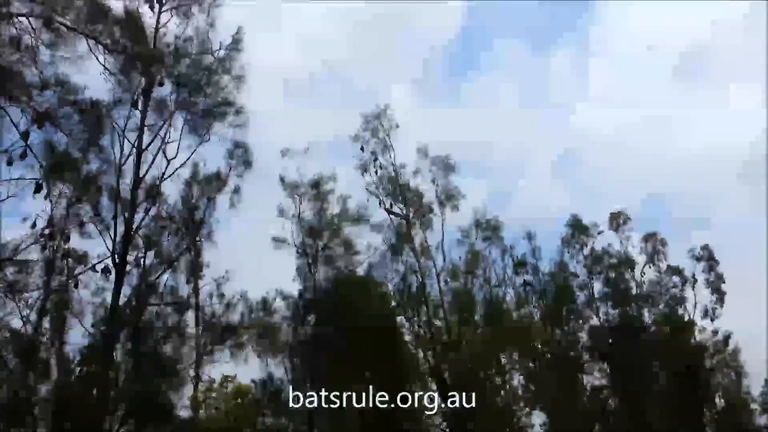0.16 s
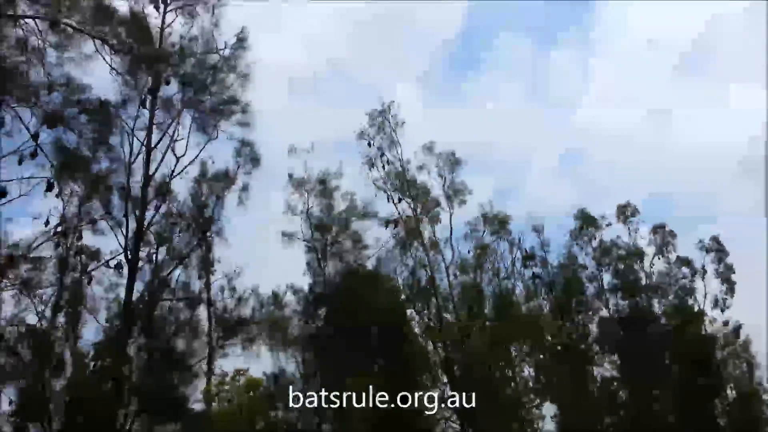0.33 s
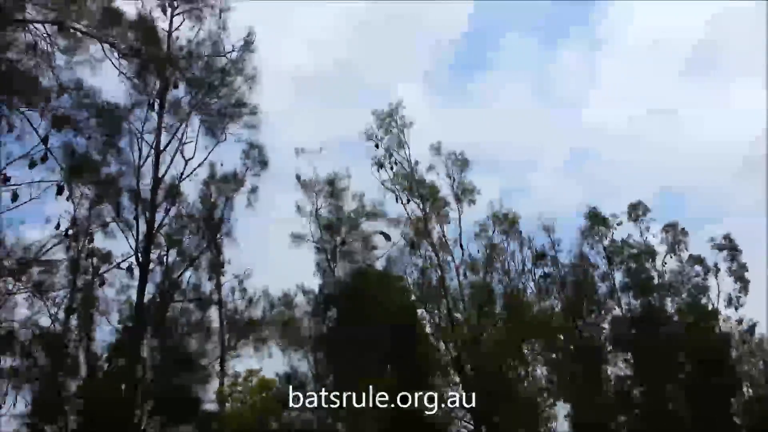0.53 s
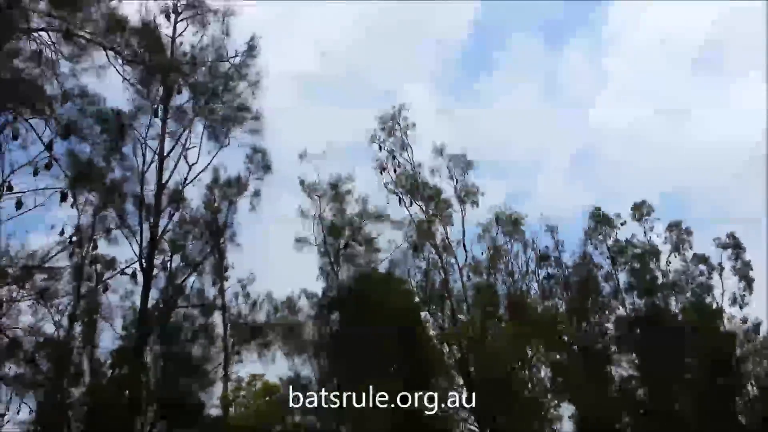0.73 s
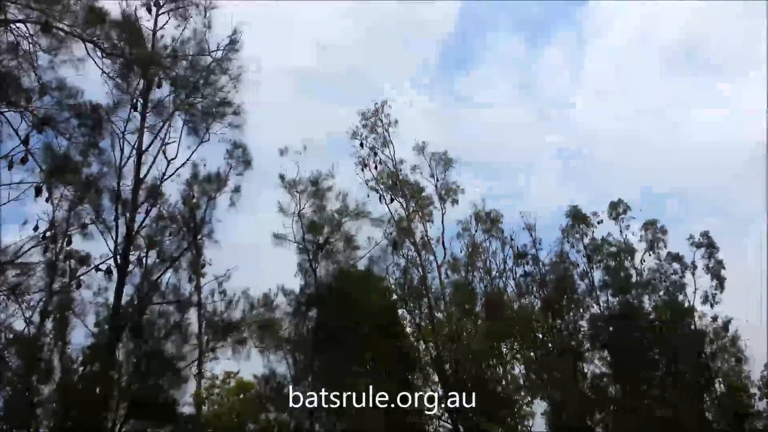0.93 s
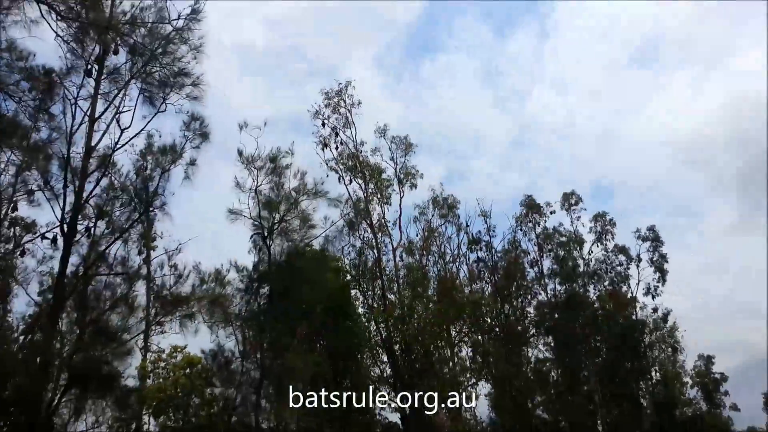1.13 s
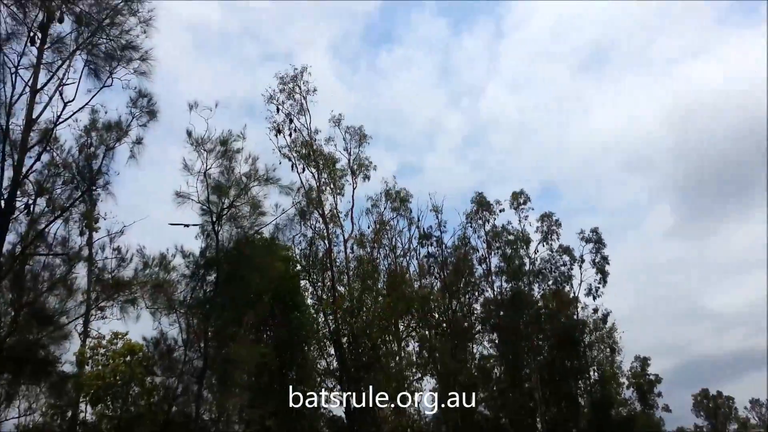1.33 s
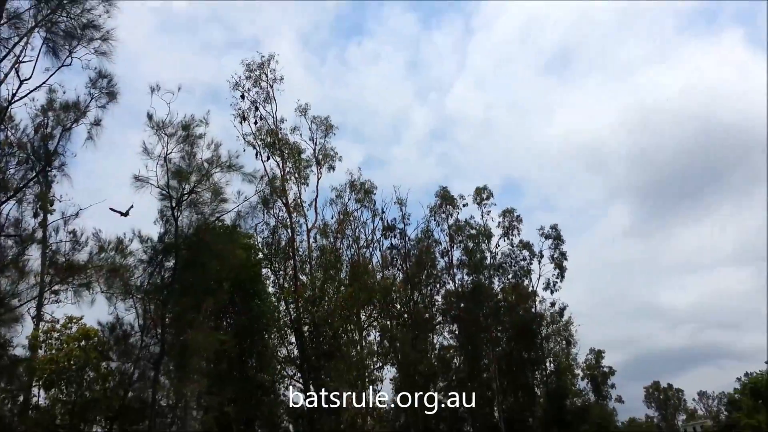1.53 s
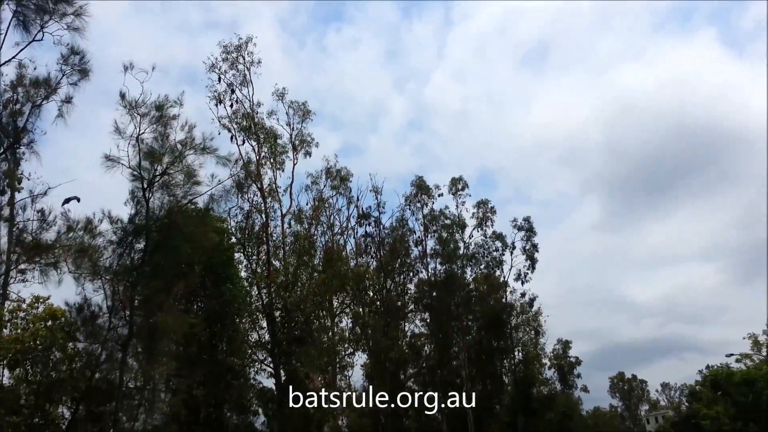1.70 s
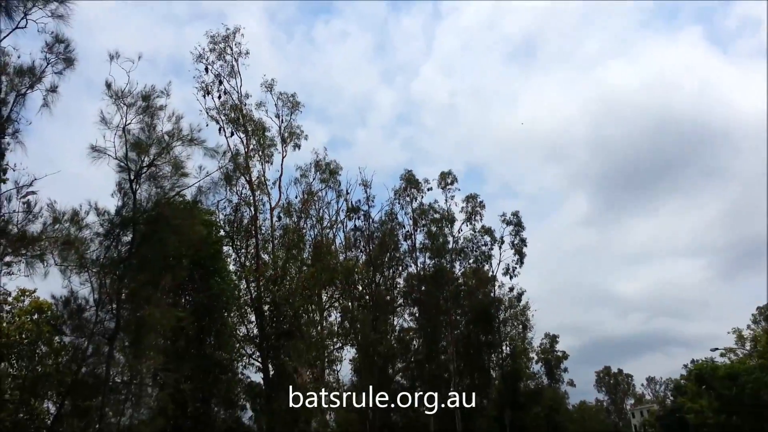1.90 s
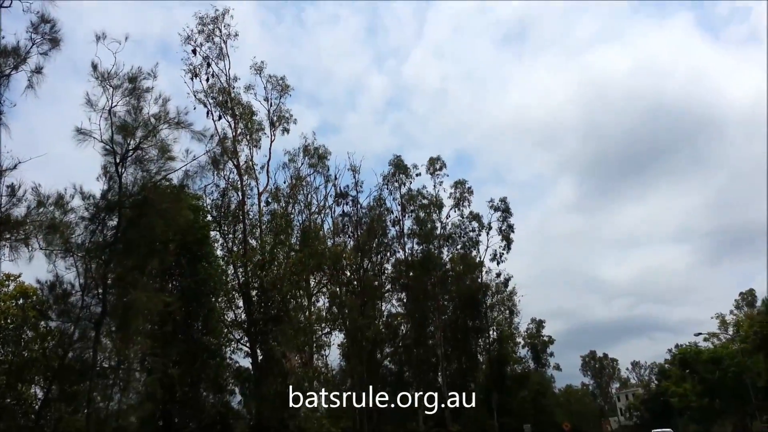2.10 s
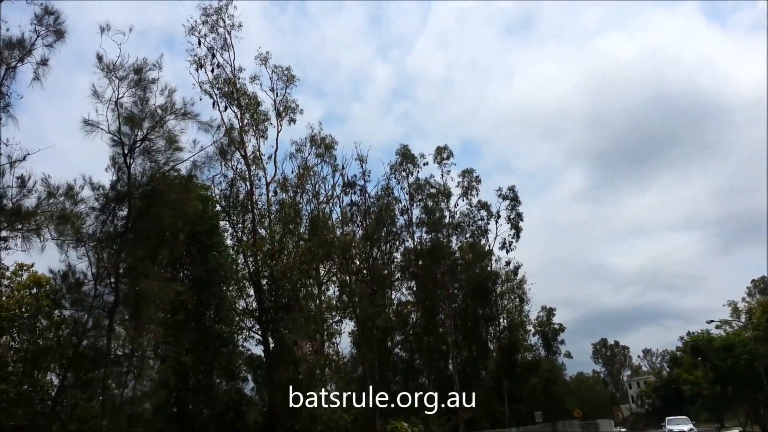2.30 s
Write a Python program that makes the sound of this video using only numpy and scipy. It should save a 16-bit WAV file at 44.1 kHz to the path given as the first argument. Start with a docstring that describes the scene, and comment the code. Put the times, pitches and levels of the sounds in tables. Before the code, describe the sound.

Bats squabble in trees outdoors. One close to the microphone gives a harsh, rattling screech, then a shorter one, while others squeal and rasp around it. The calls thin out over faint insects and a low distant wash.

```python
"""Flying foxes squabble in a stand of trees, over a far colony, insects and a low distant wash.
Neighbours start to squeal. At 0.3 s a near bat screeches: a whistle slides up, breaks into a harsh
rattle and sinks again. A shorter screech follows at 0.95 s, amid squeals and rasps; the trunks
scatter the calls. Then the squeals thin out, the colony fades and the wash slowly grows."""
import sys
import numpy as np
from scipy import signal
from scipy.fft import rfft, irfft, next_fast_len
from scipy.io import wavfile
from scipy.ndimage import uniform_filter1d

SR = 44100
rng = np.random.default_rng(int(sys.argv[2]) if len(sys.argv) > 2 else 0)


def to_wav(sig):
    """Store sig (one row per channel, or 1-D mono) as 16-bit WAV at the path in sys.argv[1].

    Samples outside -1..1 are clipped; the rate is SR.
    """
    pcm = np.clip(np.atleast_2d(sig), -1, 1) * 32767
    pcm = np.round(pcm).astype(np.int16)
    wavfile.write(sys.argv[1], SR, pcm.T)  # frames by channels


N = 103635
T = np.arange(N) / SR
BINS_HZ = np.fft.rfftfreq(2 * N, 1 / SR)


def amp(db):
    """dB to gain."""
    return 10 ** (np.asarray(db) / 20)


def unit_rms(x):
    """Scale to rms 1."""
    return x / np.sqrt(np.mean(abs(x) ** 2) + 1e-20)


def at_hz(points, hz):
    """Table lookup on a log-frequency axis."""
    f, value = np.transpose(points)
    return np.interp(np.log(hz + 1), np.log(f), value)


def colour(x, spectrum, share=1):
    """Filter by a dB spectrum times share."""
    return irfft(rfft(x, 2 * N) * amp(share * at_hz(spectrum, BINS_HZ)))[..., :N]


def wander(hz):
    """Unit-rms noise, low-passed at hz."""
    size = next_fast_len(N, True)
    rolloff = 1 + (np.fft.rfftfreq(size, 1 / SR) / hz) ** 2
    return unit_rms(irfft(rfft(rng.standard_normal(size)) / rolloff, size))[:N]


def bed(spectrum, patchy_db, correlation=None):
    """Unit-rms stereo noise; level drifts in small time-frequency patches."""
    hz, _, z = signal.stft(rng.standard_normal((2, N)), SR, nperseg=512, noverlap=384)
    patches = uniform_filter1d(rng.standard_normal(z.shape[1:]), size=5, axis=0)
    patches = unit_rms(uniform_filter1d(patches, size=16, axis=1))
    common = np.clip(at_hz(correlation, hz), -1, 1)[:, None] if correlation else 0
    right = common * z[0] + np.sqrt(1 - common ** 2) * z[1]
    z = np.array([z[0], right]) * amp(at_hz(spectrum, hz)[:, None] + patchy_db * patches)
    return unit_rms(signal.istft(z, nperseg=512, noverlap=384)[1][:, :N])


# Wash spectrum: f/Hz, relative level/dB
WASH_SPECTRUM = [(130, -74), (245, -10), (390, -12), (510, -2), (700, -9.5), (920, -1), (1150, -7.5),
                 (1900, -6), (2800, -20.5), (13000, -47)]
# Wash envelope: t/s, level/dB
WASH_ENVELOPE = [(0, -41), (1.2, -39.5), (1.7, -36.5), (2.15, -35), (2.35, -36)]
# Wash stereo image: f/Hz, L-R correlation/0-1
WASH_CORRELATION = [(300, 0.9), (700, 0.48), (2000, 0)]


def wash():
    """Low distant noise, slowly growing, centred in the bass."""
    gain = amp(np.interp(T, *np.transpose(WASH_ENVELOPE)))
    return gain * bed(WASH_SPECTRUM, patchy_db=1.1, correlation=WASH_CORRELATION)


# Insect spectrum: f/Hz, relative level/dB
INSECT_SPECTRUM = [(3900, -22), (4750, 2.5), (5900, -8.5), (6900, -0.5), (7600, -11.5), (9500, -22),
                   (14000, -68)]


def insects():
    """Steady chorus in two high bands."""
    return amp(-36) * bed(INSECT_SPECTRUM, patchy_db=1.3)


# Colony spectrum: f/Hz, relative level/dB
COLONY_SPECTRUM = [(1500, -44), (2300, -1.5), (3200, 0.5), (6000, -15), (8500, -15.5), (14000, -48)]
# Colony envelope: t/s, level/dB
COLONY_ENVELOPE = [(0, -33), (.8, -35), (1.4, -36), (1.75, -42), (2, -48.5), (2.35, -44.5)]


def colony():
    """Far bats, blurred into patchy noise."""
    return amp(np.interp(T, *np.transpose(COLONY_ENVELOPE))) * bed(COLONY_SPECTRUM, patchy_db=4.0)


def reflect(x, response):
    """Convolve with a stereo response, normalised to unit energy on the left."""
    return signal.fftconvolve(x * np.ones((2, 1)), response / np.linalg.norm(response[0]), axes=1)[:, :N]


# Grove decay: f/Hz, T60/s
GROVE_T60 = [(500, 0.13), (3000, 0.49), (8000, 0.14), (14000, 0.052)]


def grove_echo(x):
    """Diffuse tail from the trees, longest near 3 kHz."""
    hz, t, z = signal.stft(rng.standard_normal((2, SR // 2)), SR)
    decay = amp(-60 * t / at_hz(GROVE_T60, hz)[:, None]) * (t > .01)
    return reflect(x, signal.istft(z * decay, SR)[1])


def branch_scatter(x, decay_s=0.014):
    """Early reflections off nearby branches, independent per side."""
    t = T[:SR // 16]
    return reflect(x, rng.standard_normal((2, len(t))) * np.exp(-t / decay_s))


def throat(cycles, hoarse, width_hz):
    """Whistle; hoarse is the share of power smeared into a noise band."""
    hoarse = np.clip(hoarse, 0, 1)
    smear = (wander(width_hz / 2) + 1j * wander(width_hz / 2)) / np.sqrt(2)
    envelope = np.sqrt(1 - hoarse) + np.sqrt(hoarse) * smear
    return np.sqrt(2) * (envelope * np.exp(2j * np.pi * cycles)).real


def swells(rows):
    """Sum of Gaussian gain envelopes."""
    return sum(amp(db) * np.exp(-((T - centre_s) / half_s) ** 2) for centre_s, half_s, db in rows)


# Twitter swells: centre t/s, half length/s, level/dB
TWITTERS = [(0.107, 0.13, -53.5), (1.868, .0018, -41.5), (1.934, 0.057, -55)]


def twitters(hz=10860):
    """Faint, very high chatter: narrow-band noise."""
    return swells(TWITTERS) * throat(hz * T, hoarse=1, width_hz=2200)


# Rasp swells: centre t/s, half length/s, level/dB
RASPS = [(0.617, 0.12, -34), (1.402, 0.098, -40)]
# Rasp spectrum: f/Hz, relative level/dB
RASP_SPECTRUM = [(2000, -41), (3500, -4.5), (7000, 0), (14000, -22.5)]


def neighbour_rasps(flutter_db=3.1):
    """Toneless, fluttering calls."""
    gain = swells(RASPS) * amp(flutter_db * wander(98))
    return gain * unit_rms(colour(rng.standard_normal((2, N)), RASP_SPECTRUM))


# Neighbours' cries: start t/s, length/s, first f/Hz, last f/Hz, level/dB
SQUEALS = [(0.159, 0.063, 2430, 2334, -46), (0.213, 0.091, 3010, 2950, -29.5),
           (0.296, 0.022, 2990, 2856, -22.5), (0.338, 0.028, 2156, 2120, -33),
           (0.36, 0.06, 2878, 2884, -28.5), (0.384, 0.043, 2170, 1850, -34.5),
           (0.426, 0.053, 2910, 2848, -25.5), (.476, 0.0446, 2450, 2940, -30.5),
           (0.514, 0.068, 4400, 4630, -31.5), (0.538, 0.1, 2708, 2670, -35.5),
           (0.58, 0.059, 4550, 4550, -30.5), (.54, 0.099, 5370, 5540, -32.5),
           (0.588, 0.057, 3940, 3780, -41), (0.632, 0.043, 2855, 2870, -32),
           (0.639, 0.08, 5230, 4990, -34.5), (0.644, 0.087, 4510, 3780, -33.5),
           (.665, 0.054, 5880, 5250, -39), (0.687, 0.051, 2860, 2452, -31),
           (0.877, 0.026, 2200, 2322, -32.5), (0.89, .2, 2286, 2270, -37.5),
           (1.054, 0.0185, 2540, 3060, -32), (1.111, 0.046, 2232, 2236, -31.5),
           (1.191, 0.071, 3370, 3255, -46), (1.206, 0.032, 2229, 2165, -30.5),
           (1.275, 0.021, 2274, 2262, -32.5), (1.35, 0.025, 5400, 5170, -40),
           (1.367, 0.15, 2307, 2176, -36), (1.411, 0.013, 2322, 2190, -36), (1.456, .014, 3380, 3190, -43),
           (1.66, 0.054, 2260, 2385, -42), (1.713, .17, 3680, 3430, -46.5), (2.013, 0.011, 3280, 3200, -37)]


def squeal(start_s, length_s, first_hz, last_hz, db, width_hz=470):
    """Fluttering cry on an arched glide, one overtone; longer cries are hoarser."""
    progress = np.clip((T - start_s) / length_s, 0, 1)
    arch = np.sin(np.pi * progress).clip(0)
    hoarse = 3.2 * length_s
    glide_hz = first_hz + (last_hz - first_hz) * progress
    cycles = np.cumsum(glide_hz * (1 + .012 * arch + .011 * wander(96.2))) / SR
    voice = throat(cycles, hoarse, width_hz) + amp(-18) * throat(2 * cycles, hoarse, 2 * width_hz)
    flutter = 1 + 0.21 * wander(89)
    return amp(db) * voice * np.sqrt(arch) * flutter


# Near bat's two calls: t/s, f/Hz, level/dB, rattle depth/0-1, hoarseness/0-1
SCREECH_LONG = [(.269, 2106, -36, 0.06, 0.2), (.293, 2934, -18.5, 0.38, 0.03), (.299, 3835, -15, 0.23, 0),
                (.345, 3962, -19.5, 0.69, 0.7), (.385, 3777, -22.5, 0.78, 0.42),
                (.47, 3690, -21, 0.77, 0.09), (.528, 3790, -27, .87, 0.28), (.54, 3737, -22, 0.53, 0.2),
                (.575, 3692, -18.5, 0.4, 0.16), (.598, 3428, -22, .2, 0.06), (.62, 2534, -34, 0.2, 0.08)]
SCREECH_SHORT = [(.945, 2593, -24, 0.047, 0.045), (.961, 3018, -20.5, 0.11, 0.06),
                 (.966, 3560, -24, 0.36, 0.24), (.988, 3686, -15, 0.83, 0.14),
                 (1.011, 3634, -14, 0.77, 0.026), (1.031, 3470, -24, 0.69, 0.23),
                 (1.056, 3506, -20.5, 0.79, 0.087), (1.092, 3460, -26.5, 0.66, 0.22),
                 (1.125, 3480, -28.5, 0.47, 0.28), (1.165, 3235, -33.5, 0.45, 0.18),
                 (1.187, 2796, -33.5, .3, 0.1)]
# Noise in the screech: f/Hz, relative level/dB
SCREECH_RASP = [(1000, -72), (2800, 1), (4500, 3.5), (5700, -3), (6600, 2), (10000, -5.5), (14000, -24)]


def screech(curve, rattle_hz, pulse_at_s, width_hz=730, ramp_s=0.0021):
    """Near bat: a whistle chopped into raspy pulses; hoarseness splits off a higher side tone."""
    times, *columns = np.transpose(curve)
    hz, db, depth, hoarse = (np.interp(T, times, column) for column in columns)
    gate = np.clip(np.minimum(T - times[0], times[-1] - T) / ramp_s, 0, 1)
    beats = rattle_hz * (T - pulse_at_s) + 0.083 * wander(43)
    pulse = (.5 + .5 * np.cos(2 * np.pi * beats)) ** 2
    chop = 1 - depth + depth * pulse
    chop /= np.sqrt(uniform_filter1d(chop ** 2, size=900) + 1e-9)  # constant power at any depth
    bend = .035 * depth * (pulse - .7)
    jitter = 0.01244 * wander(210)
    cycles = np.cumsum(hz * (1 + bend + jitter)) / SR
    whistle = throat(cycles, hoarse, width_hz)
    octave = amp(-22) * throat(2 * cycles, 0.64, 2 * width_hz)
    side_tone = amp(-4) * hoarse * sum(throat(1.11 * cycles, hoarse, width_hz) for _ in range(2))
    rasp = amp(-4.5) * unit_rms(colour(rng.standard_normal(N), SCREECH_RASP)) * np.sqrt(hoarse * chop)
    return gate * amp(db) * ((whistle + octave + side_tone) * chop + rasp)


# Stereo balance, far layers and near bat: f/Hz, L-R level/dB
FAR_BALANCE = [(500, -0.5), (2200, 3), (3300, -2.5), (4600, 3.5), (6900, 2), (10000, -9)]
NEAR_BALANCE = [(2900, -3), (3600, 4.5), (4500, 5), (5500, -2), (7000, 1), (9000, -8)]


def scene(left_lag_s=.00004):
    """Near bat and neighbours with their echoes, over the distant beds."""
    bat = screech(SCREECH_LONG, rattle_hz=99, pulse_at_s=.351)
    bat += screech(SCREECH_SHORT, rattle_hz=92.5, pulse_at_s=1.011)
    left = irfft(rfft(bat, 2 * N) * np.exp(-2j * np.pi * left_lag_s * BINS_HZ))[:N]
    near = np.array([left, bat]) + amp(-5.5) * branch_scatter(bat) + amp(-9.5) * grove_echo(bat)
    neighbours = sum(squeal(*row) for row in SQUEALS) + neighbour_rasps() + twitters()
    neighbours += amp(-6) * branch_scatter(neighbours) + amp(-9.5) * grove_echo(neighbours)
    far = neighbours + colony() + insects() + wash()
    left_right = np.array([[.5], [-.5]])
    return colour(far, FAR_BALANCE, left_right) + colour(near, NEAR_BALANCE, left_right)


def record(dry, low_hz=130, high_hz=13200):
    """Microphone bass cut and band limit."""
    highpass = signal.butter(4, low_hz, "high", fs=SR, output="sos")
    lowpass = signal.firwin(127, high_hz, window=("kaiser", 9), fs=SR)
    return signal.oaconvolve(signal.sosfilt(highpass, dry), lowpass[None], "same")


dry = scene()
out = record(dry)
to_wav(out)
```